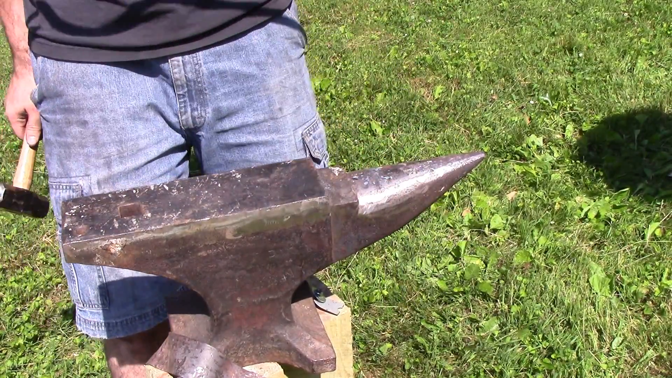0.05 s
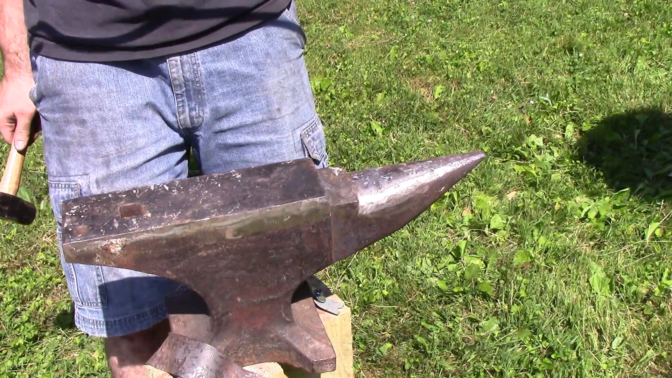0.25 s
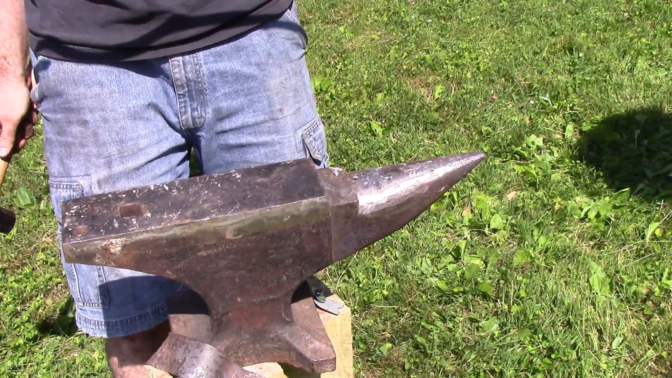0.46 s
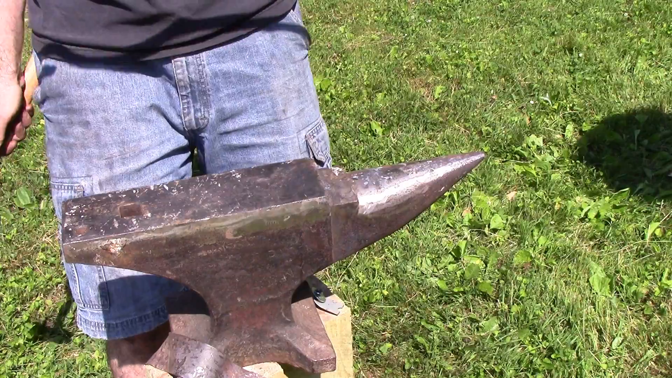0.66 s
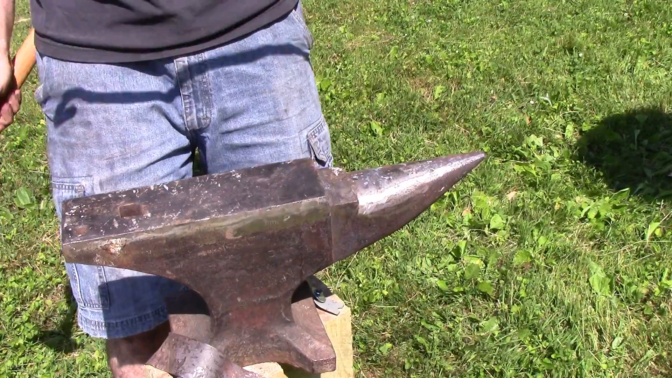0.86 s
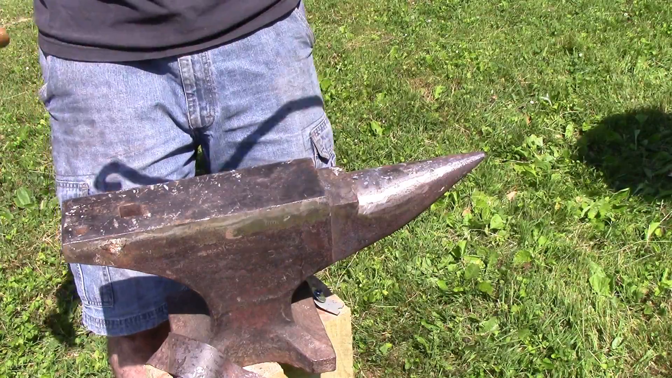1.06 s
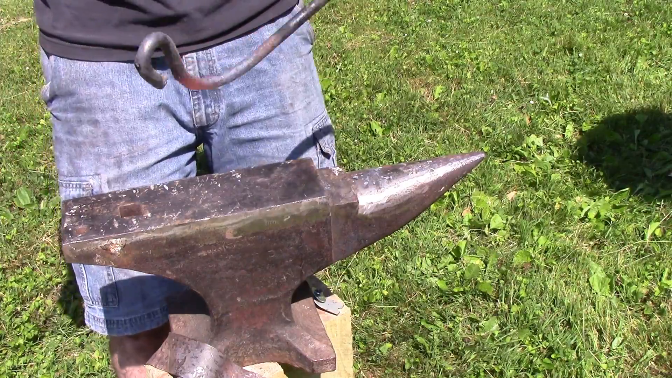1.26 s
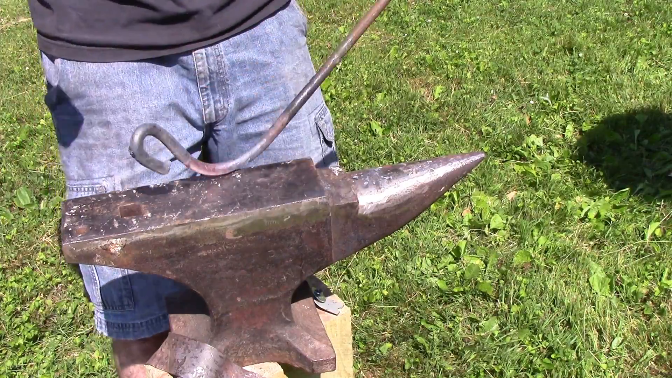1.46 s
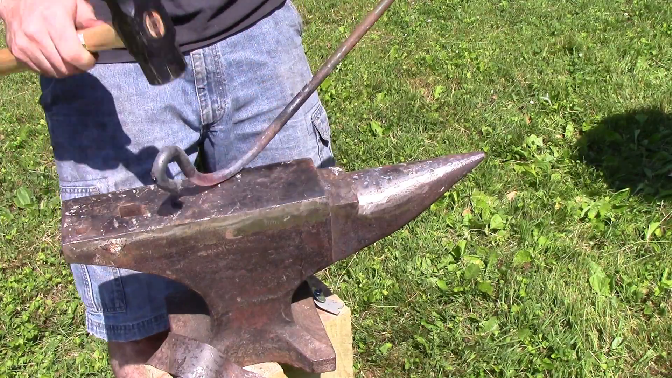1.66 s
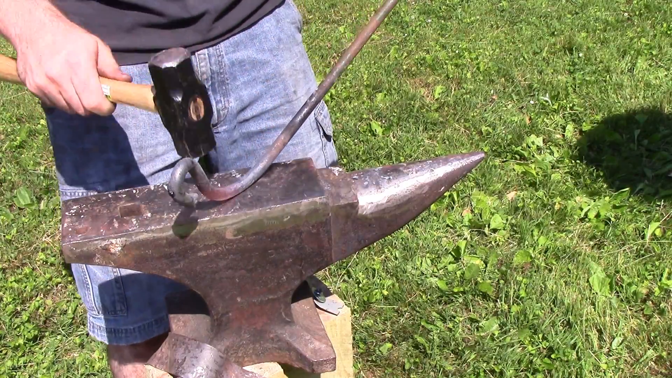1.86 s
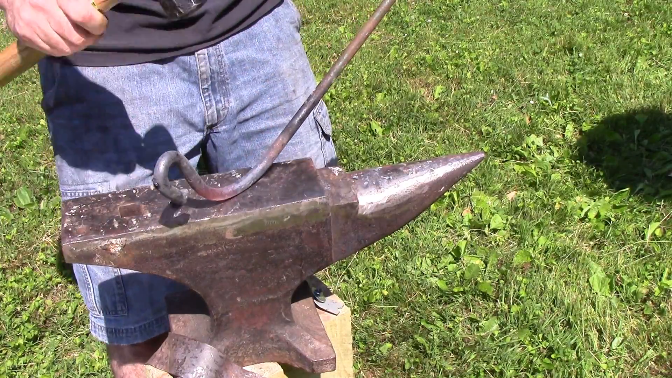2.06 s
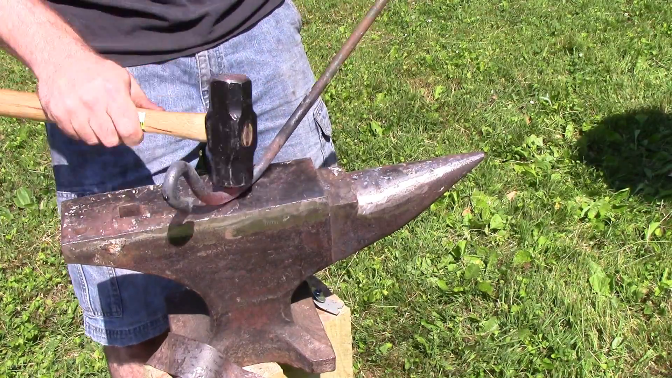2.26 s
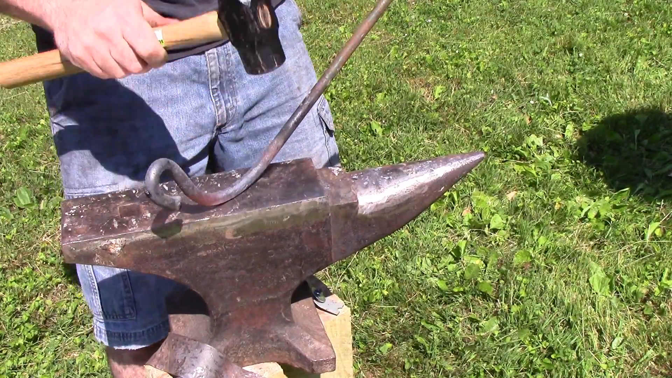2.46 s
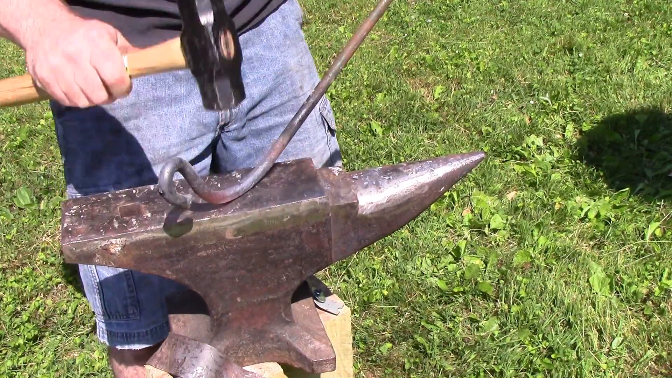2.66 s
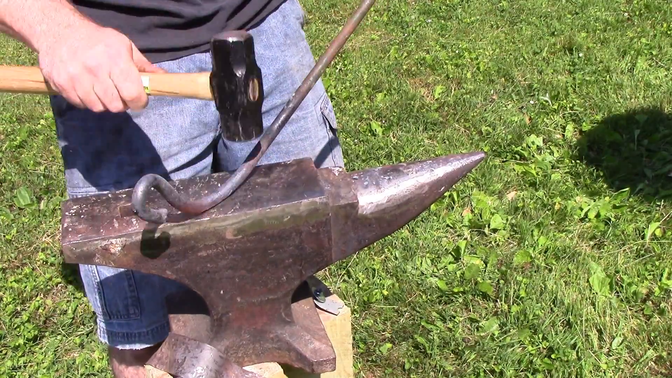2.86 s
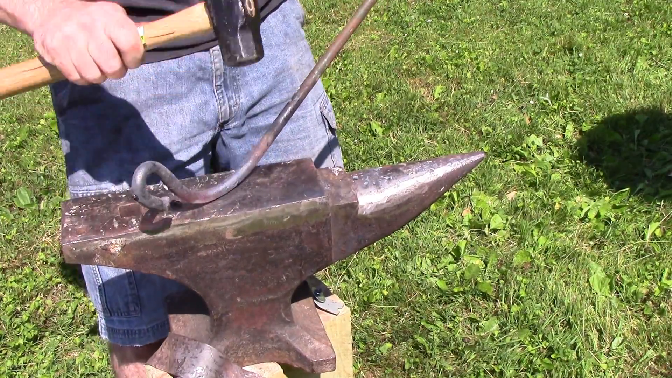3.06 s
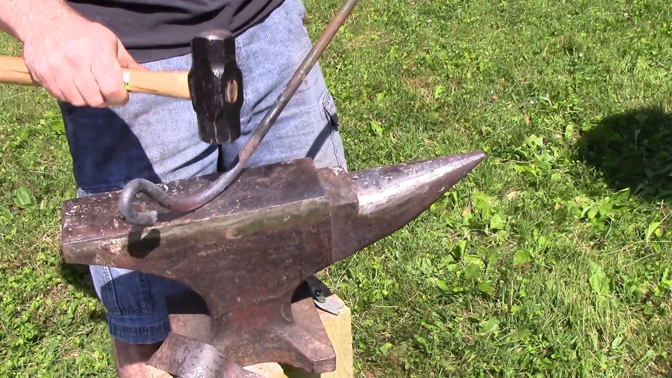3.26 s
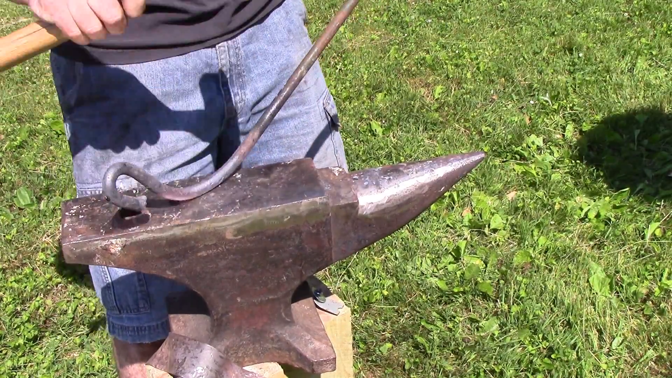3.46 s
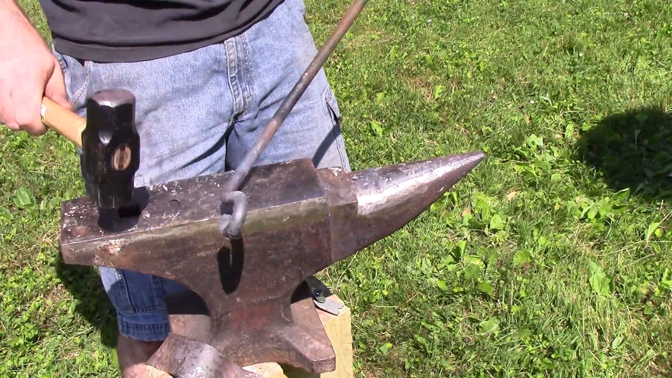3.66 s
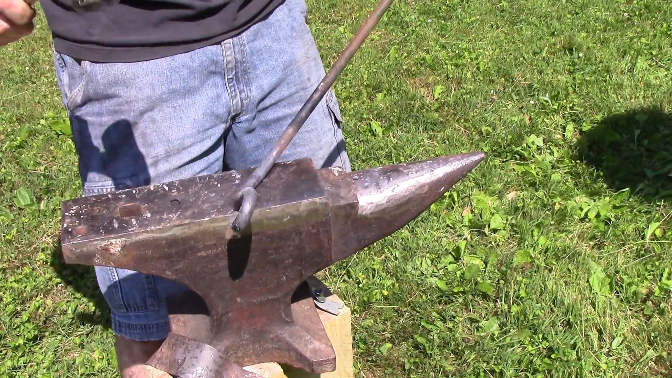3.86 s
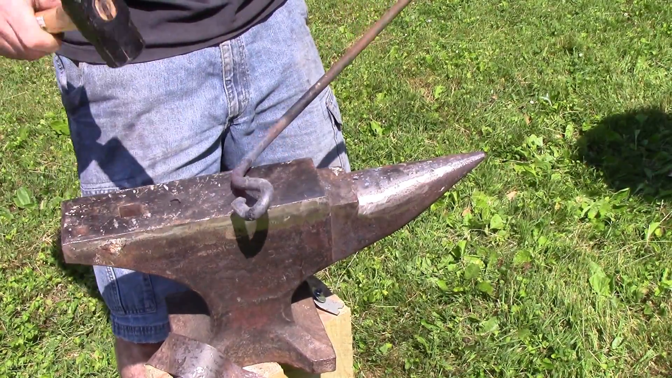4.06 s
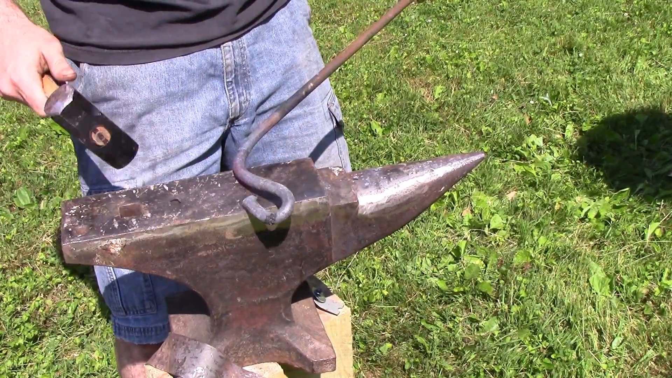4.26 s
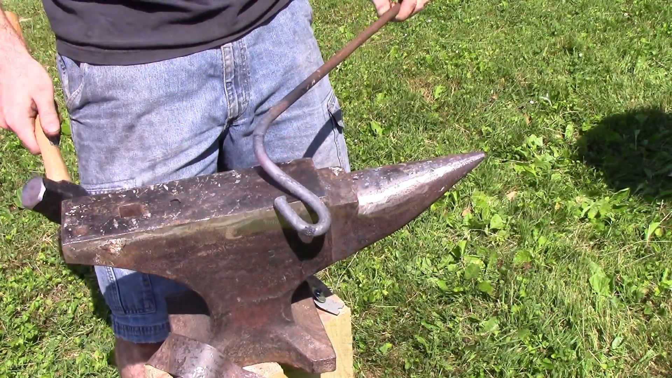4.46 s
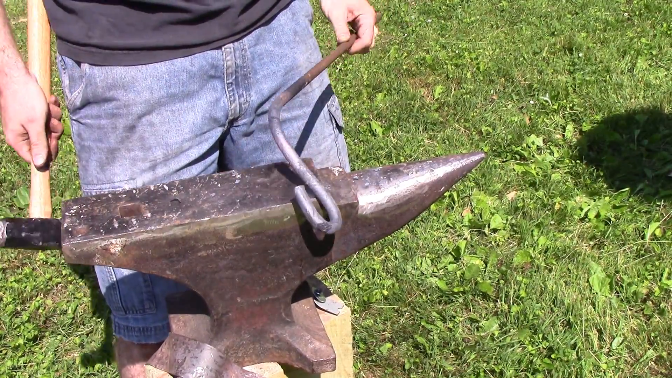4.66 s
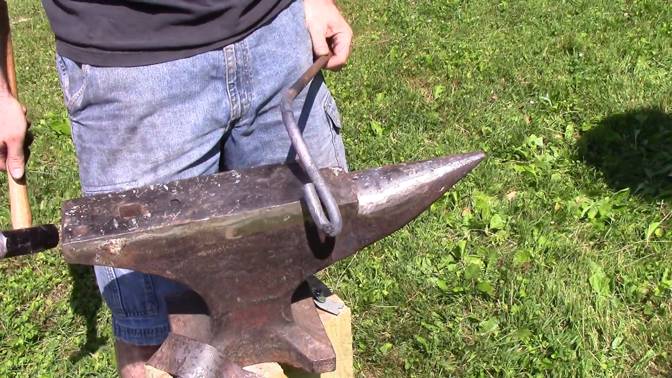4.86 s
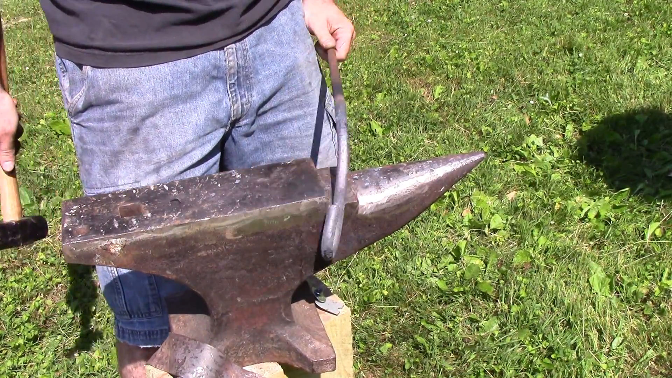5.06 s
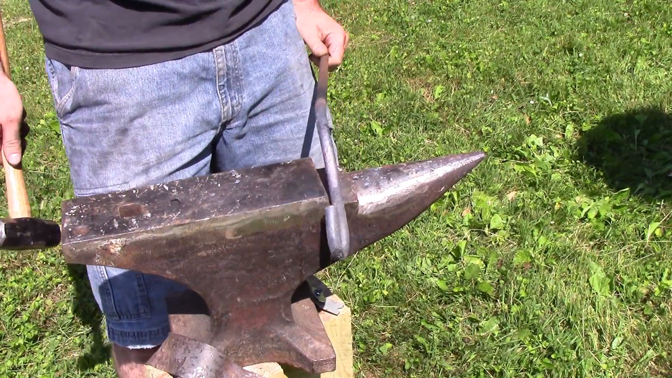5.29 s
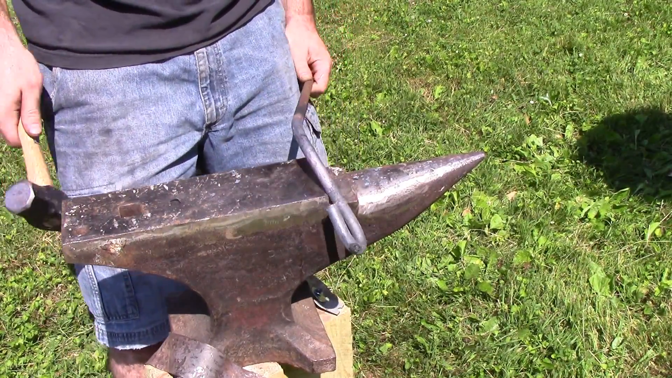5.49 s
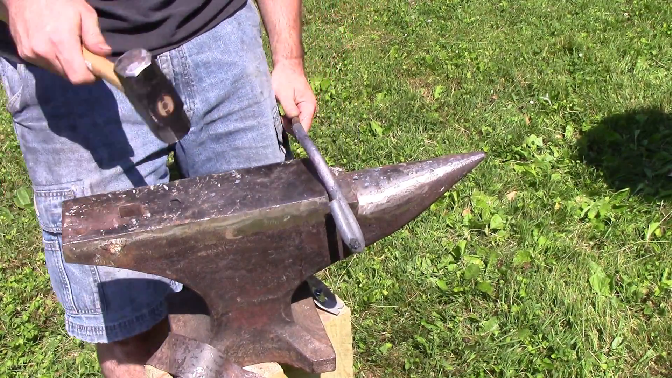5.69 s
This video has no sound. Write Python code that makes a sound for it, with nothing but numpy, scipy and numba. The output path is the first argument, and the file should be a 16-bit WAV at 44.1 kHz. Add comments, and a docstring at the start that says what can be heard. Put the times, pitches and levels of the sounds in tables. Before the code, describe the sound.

Outdoors on a lawn, close to an anvil. At first a thin high note near 5.6 kHz from earlier work fades over distant traffic rush, with a tiny tick at 0.2 s, soft bumps until 0.7 s and faint blurred bird calls. Around 1.8 s the traffic grows slightly nearer. A hammer hits a hot steel rod at 1.63, 2.41, 2.88, 3.32 and 3.76 s: loud, short, dull clanks with little ringing, the rod bouncing and chattering lightly about a tenth of a second after each. At 3.80 s, almost merged with the fifth blow, the hammer drops on bare steel: a hard, slightly clipped clang, then one piercing, gently wavering high note. It fades steadily, faster after 4.45 s as the rod leans on the anvil, and more so after 5.4 s. Small ticks and bumps come at 4.6 and 5.2 s. Faint rustles and a thin echo from trees surround it.

```python
"""A high anvil note is already fading over a distant rush of traffic, with light ticks and a few faint birds.
Then a hot steel rod is bent by five dull hammer blows, and the rod chatters after each.
At last the hammer drops on the bare face and the anvil sings one high note, which pulls the gain down.
Contacts are shaped noise bursts plus damped sine modes; the long note is one sine with a wavering level.
Birds, traffic, rumble, leaves and rustles are filtered noise; the trees echo the smithy's sounds thinly."""
import sys
import numpy as np
from scipy import signal
from scipy.fft import rfft, irfft, next_fast_len
from scipy.io import wavfile
from scipy.ndimage import map_coordinates
from numba import njit

SR = 44100
rng = np.random.default_rng(int(sys.argv[2]) if len(sys.argv) > 2 else 0)


def digitize_waveform(pressure):
    """Quantize a signal to 16-bit integers and store it at the path in sys.argv[1].

    Rows of a 2-D input are taken as channels; values are limited to [-1, 1].
    """
    field = np.atleast_2d(pressure).T
    bounded = np.clip(field, -1, 1)
    quanta = np.round(bounded * 32767).astype(np.int16)
    wavfile.write(sys.argv[1], SR, quanta)


N = 252681
TIME = np.arange(N) / SR
AGE = TIME[:SR]  # seconds since the start of a one-second sound

# Levels are relative, ahead of the gain control.
# Blows on the hot rod: (time [s], strength [dB], force passed on to the anvil [dB],
#   the spot's lift of the low anvil modes [dB], clank tilt [dB/octave], clank centre [Hz],
#   knock centre [Hz], favoured high anvil mode [Hz], rod note [Hz])
BLOWS = [(1.6273, -7.5, 1, 3.5, 2.5, 4800, 606, 8955, 3445),
         (2.407, -5, -6, 5, -5.5, 2896, 310, 3900, 2260), (2.8760, -5, 0.5, -8, 2.5, 3450, 420, 7400, 2260),
         (3.3170, -5, 1.5, -6.5, 1.5, 5200, 1750, 11400, 4200),
         (3.7610, -4, 8, 4, 3, 2850, 810, 11490, 2273)]
# Landings of the rod thrown up by a blow: (time [s], level [dB], tilt [dB/octave], loss per rebound [dB])
LANDINGS = [(1.728, -30, -3, 17), (2.529, -27, -5, 3.5), (2.943, -20, -4, 10), (3.403, -22.5, -2.5, 8.5),
            (3.903, -7.5, 1.5, 18)]
# Light touches while handling the work: (time [s], level [dB], tilt [dB/octave])
TICKS = [(0.216, -43, 8), (4.637, -36, -17), (5.193, -42, -10)]
# Dull bumps while handling the work: (time [s], level [dB], centre [Hz])
BUMPS = [(0.334, -48, 330), (0.589, -42.5, 232), (0.731, -47, 197), (5.191, -30.5, 515), (5.228, -34, 556)]
# The rod leans on the anvil, then harder: (time [s], added loss [dB/s])
LEANS = [(4.45, 6.5), (5.421, 15)]
# Low anvil modes: (frequency [Hz], level [dB], t60 [s])
LOW_MODES = [(2771, -2, .24), (2824, 0, .19), (4212, -17, .14), (4224, -28, .6), (4598, -27, .3),
             (4845, -23, .14)]
# High anvil modes: (frequency [Hz], level [dB], t60 [s])
HIGH_MODES = [(3967, -15, .6), (4200, -4, .42), (4334, -15, .4), (6013, -6, .35), (6638, -5, .33),
              (7160, 0, .24), (7391, -9.5, .7), (7736, -8, .72), (8027, -8.5, .78), (8955, -9, .18),
              (10220, -12, .28), (10570, -14, .33), (11490, -3, .3), (11900, -11, .1), (12590, -26, .5),
              (12825, -20, .5), (15320, -5, .065)]
# Modes of hammer head and rod pressed together: (frequency [Hz], level [dB], t60 [s])
CLANK_MODES = [(1705, -13, .06), (1924, -11, .06), (2370, -10, .06), (2770, 0, .06), (3400, -4, .06),
               (3690, -3, .055), (4209, -4, .07), (5130, -3, .05), (5315, -3, .05), (6120, -2, .045),
               (7570, -11, .045), (8740, -12, .04)]
# Spectrum of the hammer's contact: (frequency [Hz], density [dB per Hz])
CRACK = [(40, -40), (300, -26.5), (1100, -15.5), (1650, -2.5), (2100, -7.5), (2800, 2.5), (5000, -0.5),
         (6800, -6), (10000, -9), (13000, -18), (16000, -30.5)]
# Spectrum of the rod's contact with the face: (frequency [Hz], density [dB per Hz])
ROD = [(150, -25), (700, -8), (1800, -8), (2800, -5), (4400, 1.5), (6000, -11), (10000, -18),
       (16000, -43.5)]
# Echo from the trees: (frequency [Hz], t60 [s])
YARD = [(100, 1.7), (1000, 2.9), (3000, 1.45), (6000, 1.4), (16000, 0.1)]
# Bird calls: (time [s], length [s], centre [Hz], spread [Hz], level [dB])
BIRDS = [(0.317, 0.22, 2555, 110, -58), (0.332, 0.22, 3160, 150, -63.5), (0.762, 0.14, 4000, 264, -60),
         (1.927, 0.13, 2240, 200, -55), (2.066, 0.15, 2300, 220, -51.5), (4.381, 0.15, 2325, 217, -55.5)]
# Spectrum of the traffic's rush: (frequency [Hz], density [dB per Hz])
AIR = [(25, -44.5), (63, -18.5), (100, -4.5), (170, -13), (310, -2), (500, 0.5), (1080, 1), (1600, -5.5),
       (2600, -12), (4500, -24), (8000, -35), (16000, -53.5)]
# Spectrum of the low rumble: (frequency [Hz], density [dB per Hz])
RUMBLE = [(40, -37), (110, -5), (190, -1.5), (320, 0), (500, -17), (1200, -41.5)]
# Spectrum of the hiss of leaves and of the rustles: (frequency [Hz], density [dB per Hz])
HISS = [(500, -26.5), (2000, 1.5), (4000, 3.5), (8000, -9.5), (11000, -9.5), (16000, -25)]
# Swells of low rumble: (time [s], standard deviation of the bell [s], level [dB])
GUSTS = [(0.05, .36, -53.5), (3.75, 0.57, -55), (5.25, .8, -52)]
# Brief rustles of clothes and the shifted rod: (time [s], standard deviation of the bell [s], level [dB])
RUSTLES = [(2.13, 0.14, -55.5), (3.2, 0.11, -56), (3.66, 0.18, -53.5), (4.4, 0.18, -60.5), (5.65, .17, -59)]

DROP_S = 3.7977  # the hammer drops on the bare face
TOUCH_DB = -6  # first contact, against the slam that follows
KNOCK_DB, LOW_DB, HIGH_DB, SING_DB = -25, -36.5, -38, -49  # the anvil's answer to a passed force of 0 dB
KNOCK_GROWS = .6  # dB of knock per dB of passed force
ROD_NOTE_DB, ROD_NOTE_DB_PER_OCTAVE = -25.5, -13.5  # at 2 kHz; higher rod notes are weaker
SING_HZ, SING_START_DB, DROP_SING_DB = 5610.7, -39, 3  # the anvil still rings from earlier work
SING_LOSS_DB_PER_S, WAVER_DB, WAVER_PER_S = 14.5, 0.73, 9  # the free note fades and wavers
REBOUND_S, REBOUND_SHRINK = .016, .88  # first rebound, and the ratio of the next to it
RATTLE_FROM_S, RATTLE_TO_S, RATTLE_DB = 0.039, 0.14, -33  # stray touches, against the blow's strength
FAR_DB, NEAR_DB = -55, -47.5  # traffic before and after it draws nearer
NEARING_S, NEARING_TAKES_S = 1.79, 0.25  # midpoint and time constant of the approach
RUMBLE_UNDER_DB, LEAVES_DB = -14.5, -63  # steady rumble against the traffic; steady hiss of leaves
TOP_HZ = 15900  # upper end of the band


def hammer():
    """Impact: hot steel cushions five blows; bare steel meets the last with a hard touch and a weaker slam just
    after."""
    out = np.zeros(N)
    for s, db, passed_db, _, tilt_db, centre_hz, knock_hz, _, _ in BLOWS:
        knock_db = KNOCK_DB + KNOCK_GROWS * passed_db
        out += strike(s, db + TOUCH_DB, db, tilt_db, centre_hz, knock_db, knock_hz)
    drop = strike(DROP_S, touch_db=0.5, slam_db=-9, tilt_db=-5.5, centre_hz=1700, knock_db=-7.5, knock_hz=1470)
    return out + drop


def strike(s, touch_db, slam_db, tilt_db, centre_hz, knock_db, knock_hz, slam_delay=0.0012):
    """Two-stage contact: the hammer touches, slams home an instant later, and the anvil knocks on its block."""
    out = np.zeros(N)
    colour = colouring(tilt_db, centre_hz, boost_db=5.5, width=0.4)
    touch = noise(CRACK, SR, colour) * fade(t60=.008)
    crack = noise(CRACK, SR, colour) * fade(t60=.024)
    clank = amp(-13.5) * ring(CLANK_MODES, scatter_db=1.5, colour=colour)
    bent_rod = amp(-24.5) * ring(rod_modes(), scatter_db=3.0, colour=colour)
    add(out, s, amp(touch_db) * touch)
    add(out, s + slam_delay, amp(slam_db) * (crack + clank + bent_rod))
    add(out, s, amp(knock_db) * knock(knock_hz, t60=32 / knock_hz))  # low knocks last longer
    return out


def knock(hz, t60):
    """Heavily damped resonance: a short dull burst centred on one frequency."""
    hump = [(hz / 8, -45), (hz / 2, -13), (hz * .8, -1), (hz * 1.2, 0),
            (hz * 1.7, -11), (hz * 4, -35), (hz * 12, -70)]
    return noise(hump, SR) * fade(t60) * (1 - fade(t60=0.0069))


def anvil(lift_s=.0037):
    """Modal excitation: soft hot steel rings the anvil only a little, a blow on the bare face fully."""
    out = np.zeros(N)
    lift = 1 - fade(t60=.03)  # free to ring as the hammer lifts
    for s, _, passed_db, spot_db, _, _, _, favoured_hz, rod_hz in BLOWS:
        body = anvil_modes(LOW_DB + passed_db + spot_db, HIGH_DB + passed_db, favoured_hz)
        rod_db = ROD_NOTE_DB + ROD_NOTE_DB_PER_OCTAVE * np.log2(rod_hz / 2000)
        rod = amp(rod_db) * ring([(rod_hz, 0, .3)], scatter_db=2.0)
        add(out, s + lift_s, (body + rod) * lift)
    add(out, DROP_S + lift_s, anvil_modes(low_db=.5, high_db=-27.5, favoured_hz=8250) * lift)
    return out


def anvil_modes(low_db, high_db, favoured_hz):
    """Mode participation: the spot that is struck favours some of the high modes."""
    favour = colouring(0, favoured_hz, boost_db=8, width=.09)
    low = amp(low_db) * ring(LOW_MODES, scatter_db=2.5)
    high = amp(high_db) * ring(HIGH_MODES, scatter_db=2, colour=favour)
    return low + high


def singing():
    """Lightly damped mode: every blow resets its level, and the leaning rod adds damping."""
    loss_db = SING_LOSS_DB_PER_S * TIME
    for s, rate in LEANS:
        loss_db = loss_db + rate * np.maximum(TIME - s, 0)
    level_db = SING_START_DB - loss_db
    starts = [(s, SING_DB + passed_db) for s, _, passed_db, *_ in BLOWS]
    for s, sing_db in starts + [(DROP_S, DROP_SING_DB)]:
        start = round(s * SR)
        level_db[start:] = sing_db - (loss_db[start:] - loss_db[start])
    level = amp(level_db + WAVER_DB * wobble(WAVER_PER_S))
    step = 1 / (0.029 * SR)  # the swing follows with a time constant of 29 ms
    swing = signal.lfilter([step], [1, step - 1], level)
    return swing * np.sin(2 * np.pi * SING_HZ * TIME)


def chatter(count=5):
    """Inelastic rebound: the rod lands ever faster and weaker, then rattles and scrapes on its scale."""
    out = np.zeros(N)
    for s, db, tilt_db, loss_db in LANDINGS:
        for k in range(count):
            add(out, s, rod_touch(db - k * loss_db, tilt_db))
            s = s + REBOUND_S * REBOUND_SHRINK ** k
    for s, db, *_ in BLOWS[:4]:
        shares = (np.arange(count) + rng.random(count)) / count  # one random moment in each equal slot
        for delay in RATTLE_FROM_S + shares * (RATTLE_TO_S - RATTLE_FROM_S):
            add(out, s + delay, rod_touch(db + RATTLE_DB, tilt_db=-3.5))
    for s, db, *_ in BLOWS[1:4]:
        grit = unit(amp(3 * wobble(rate=250)[:SR])) * noise(ROD, SR)
        scrape = grit * fade(t60=0.54) * (1 - fade(t60=0.1))
        add(out, s + 0.045, amp(db - 42.5) * scrape)
    return out


def rod_touch(db, tilt_db):
    """Light impact: the loose rod touches the face once, with a tick and a short clink."""
    colour = colouring(tilt_db, centre_hz=3500, boost_db=1.5, width=1.0)
    tick = noise(ROD, SR, colour) * fade(t60=.04)
    clink = amp(-15.0) * ring(rod_modes(count=12), scatter_db=5, colour=colour)
    return amp(db - 4.0) * (tick + clink) * (1 - fade(t60=0.0028))


def rod_modes(count=26):
    """Shape-dependent resonance: each contact draws new short modes (frequency [Hz], level [dB], t60 [s])."""
    hz = 2 ** rng.uniform(np.log2(1400), np.log2(12000), count)
    db = np.interp(hz, *np.transpose(CRACK))
    return np.transpose([hz, db, rng.uniform(.05, 0.091, count)])


def handling():
    """Weak impacts: the work ticks and bumps as it is picked up and turned."""
    out = np.zeros(N)
    for s, db, tilt_db in TICKS:
        add(out, s, rod_touch(db, tilt_db))
    for s, db, hz in BUMPS:
        add(out, s, amp(db) * knock(hz, t60=0.064))
    return out


def yard(x):
    """Diffuse scattering: the trees return a thin echo whose decay depends on frequency, unlike by channel."""
    hz, t, z = signal.stft(rng.standard_normal((2, SR)), SR, nperseg=256)
    t60 = np.interp(hz, *np.transpose(YARD))
    decaying = z * amp(-60 * t / t60[:, None])
    tail = signal.istft(decaying, SR, nperseg=256)[1]
    tail = tail / np.linalg.norm(tail[0])
    mid, side = signal.fftconvolve(x[None], tail, axes=1)[:, :N]
    return np.array([mid + amp(-6.5) * side, mid - amp(-12) * side])


def birds():
    """Narrow-band noise: far calls, blurred by the trees, swell and fade as half-sine arches."""
    out = np.zeros(N)
    for s, length, hz, spread_hz, db in BIRDS:
        arch = np.sin(np.linspace(0, np.pi, round(length * SR)))
        band = [(hz - 3 * spread_hz, -80), (hz - spread_hz, -14), (hz, 0),
                (hz + spread_hz, -14), (hz + 3 * spread_hz, -80)]
        add(out, s, amp(db) * arch * noise(band, SR)[:len(arch)])
    return out


def background():
    """Incoherent sum: nearing traffic, swelling rumble, rustles over hissing leaves, near alike in both channels."""
    nearness = 1 / (1 + np.exp((NEARING_S - TIME) / NEARING_TAKES_S))
    rush_db = FAR_DB + (NEAR_DB - FAR_DB) * nearness
    rush = amp(rush_db + 0.4 * wobble(rate=9.6))
    rumble_level = np.sqrt(amp(rush_db + RUMBLE_UNDER_DB) ** 2 + swells(GUSTS))
    rumble = rumble_level * amp(1.4 * wobble(rate=33)) * noise(RUMBLE, N)
    hiss_level = np.sqrt(amp(LEAVES_DB) ** 2 + swells(RUSTLES))
    hiss = hiss_level * amp(1.1 * wobble(rate=82)) * noise(HISS, N)
    mid = rush * noise(AIR, N) + rumble + hiss
    side = amp(-19.0) * rush * noise(AIR, N)
    return np.array([mid + side, mid - side])


def swells(rows):
    """Addition of powers: bell-shaped amplitude swells, squared and summed."""
    return sum((amp(db) * np.exp(-.5 * ((TIME - s) / width) ** 2)) ** 2 for s, width, db in rows)


def amp(db):
    """Decibel law: level to amplitude ratio."""
    return 10 ** (np.asarray(db) / 20)


def unit(x):
    """Normalization: scale to rms 1."""
    return x / np.sqrt(np.mean(x ** 2) + 1e-20)


def wobble(rate):
    """Random modulation: a smooth curve through random knots, rate knots a second."""
    return map_coordinates(rng.standard_normal(int(N * rate / SR) + 4), [TIME * rate])


def noise(spectrum, size, colour=np.zeros_like):
    """Spectral shaping: noise of rms 1 with the given spectrum and colour."""
    hz = np.fft.rfftfreq(size, 1 / SR)
    points_hz, db = np.transpose(spectrum)
    shape_db = np.interp(np.log(hz + 1), np.log(points_hz), db) + colour(hz)
    return unit(irfft(rfft(rng.standard_normal(size)) * amp(shape_db), size))


def colouring(tilt_db, centre_hz, boost_db, width):
    """Spectral weighting of a contact: a treble tilt above 2.5 kHz plus a hump (width in octaves), in dB."""
    def colour(hz):
        treble_octaves = np.log2(np.maximum(hz / 2500, 1))
        hump = np.exp(-(np.log2((hz + 1) / centre_hz) / width) ** 2)
        return tilt_db * treble_octaves + boost_db * hump
    return colour


def fade(t60):
    """Exponential damping over one second, falling 60 dB in t60 seconds."""
    return amp(-60 * AGE / max(t60, .002))


def ring(modes, scatter_db, colour=np.zeros_like):
    """Modal superposition: damped sines of randomly scattered strength and random sign, shaped by the colour."""
    hz, db, t60 = np.transpose(modes)
    db = db + scatter_db * rng.standard_normal(len(hz)) + colour(hz)
    gains = rng.choice([-1, 1], len(hz)) * amp(db)
    return sum(g * fade(t) * np.sin(2 * np.pi * f * AGE) for f, g, t in zip(hz, gains, t60))


def add(track, s, sound):
    """Linear superposition: mix a sound into the track at time s."""
    part = track[round(s * SR):][:len(sound)]
    part += sound[:len(part)]


def scene():
    """Direct sound and echo: the anvil stands close, slightly to the left, on an open lawn."""
    forge = hammer() + anvil() + singing() + chatter() + handling()
    direct = forge * amp([[.35], [-.35]])
    return direct + amp(-29.0) * yard(forge) + birds() + background()


@njit
def follow(level, attack, release):
    """Envelope detection: a level that rises fast and sinks slowly."""
    out, held = np.empty_like(level), 0.
    for i in range(len(level)):
        held += (level[i] - held) * (attack if level[i] > held else release)
        out[i] = held
    return out


def record(dry, limit_db=-7, attack_s=0.0022, release_s=0.026, low_cut_hz=70, lopsided=0.0049):
    """Dynamic compression: gain control holds loud sound down, early peaks clip, and the band ends steeply."""
    level = follow(np.abs(dry).mean(axis=0), 1 / (attack_s * SR), 1 / (release_s * SR))
    held = np.clip(dry / np.maximum(1, level / amp(limit_db)), -1, 1)
    held = held + lopsided * held ** 2  # a slight square-law bend adds the octave of the loud note
    held = signal.sosfilt(signal.butter(2, low_cut_hz, "high", fs=SR, output="sos"), held)
    size = next_fast_len(N + SR // 2)
    in_band = np.fft.rfftfreq(size, 1 / SR) < TOP_HZ
    return irfft(rfft(held, size) * in_band, size)[:, :N]


dry = scene()
out = record(dry)
digitize_waveform(out)
```